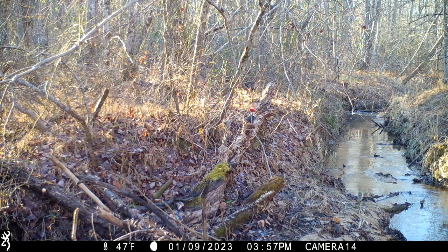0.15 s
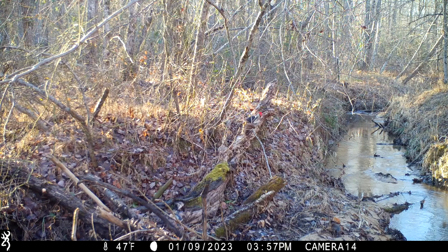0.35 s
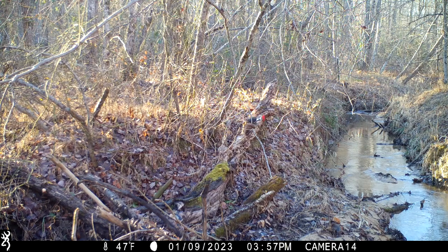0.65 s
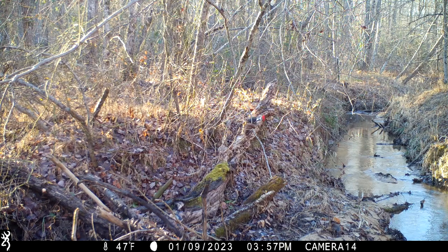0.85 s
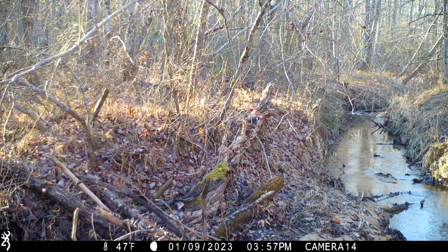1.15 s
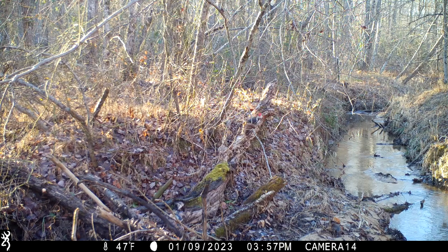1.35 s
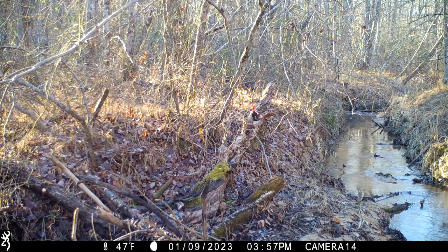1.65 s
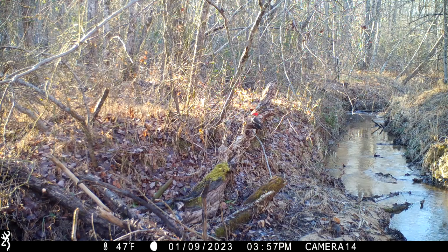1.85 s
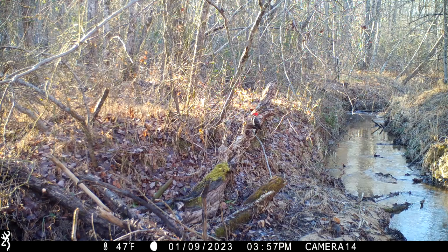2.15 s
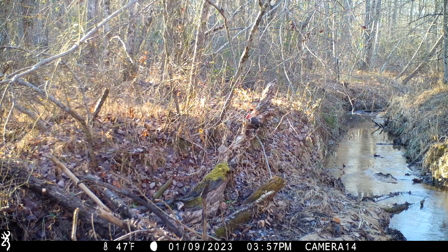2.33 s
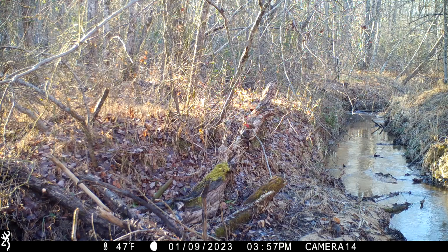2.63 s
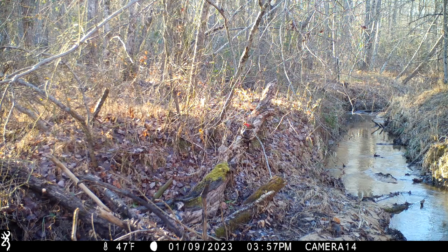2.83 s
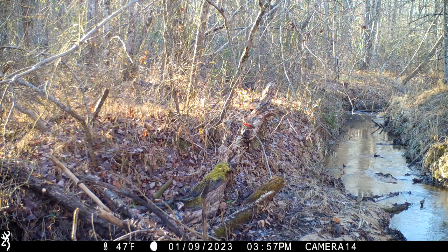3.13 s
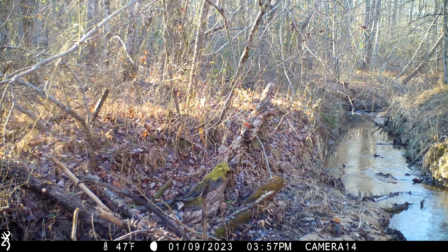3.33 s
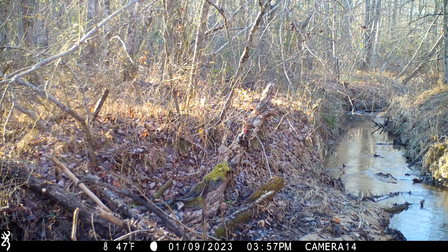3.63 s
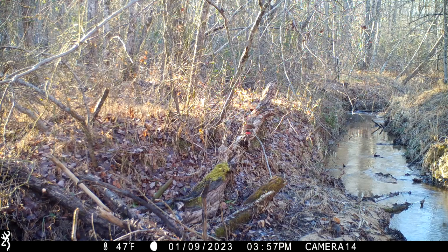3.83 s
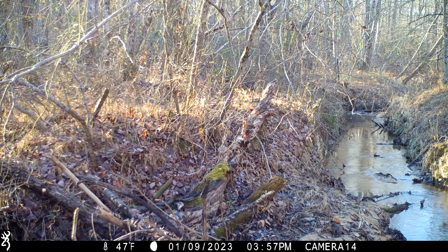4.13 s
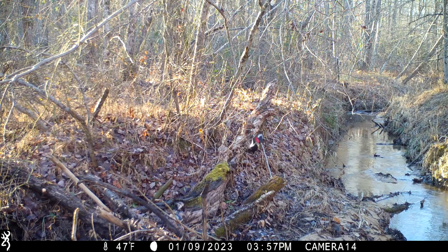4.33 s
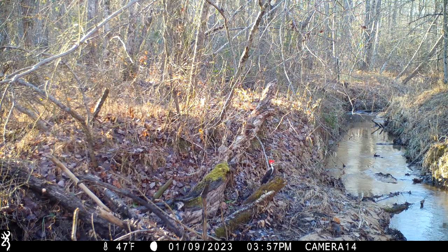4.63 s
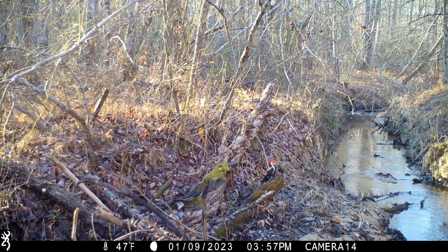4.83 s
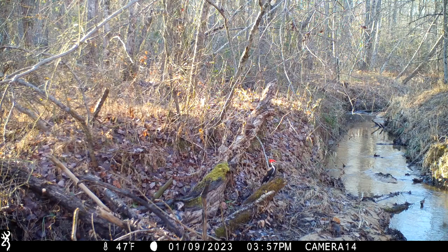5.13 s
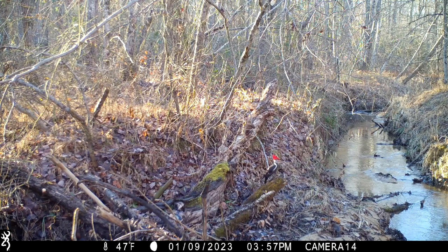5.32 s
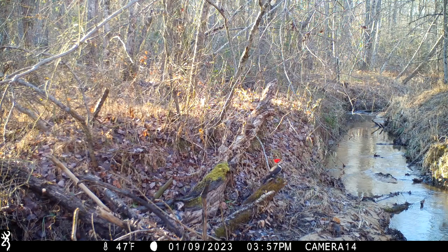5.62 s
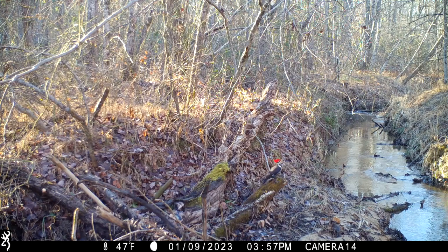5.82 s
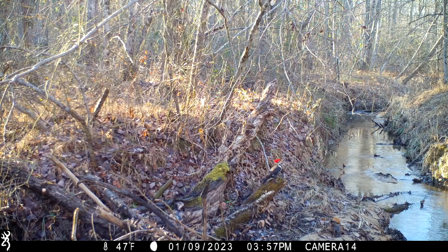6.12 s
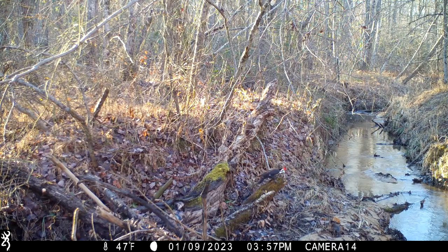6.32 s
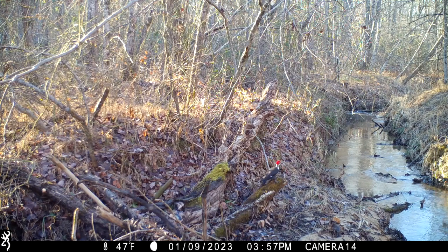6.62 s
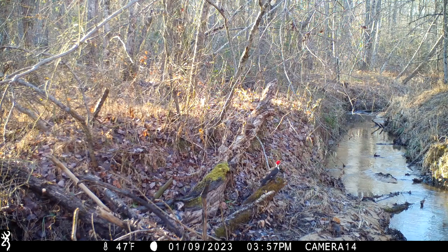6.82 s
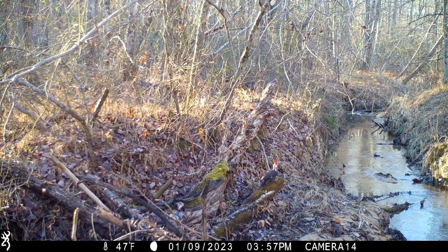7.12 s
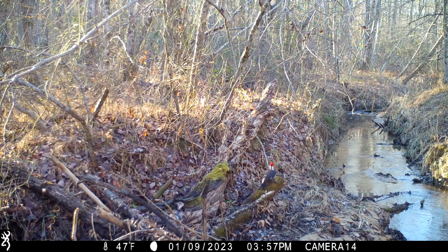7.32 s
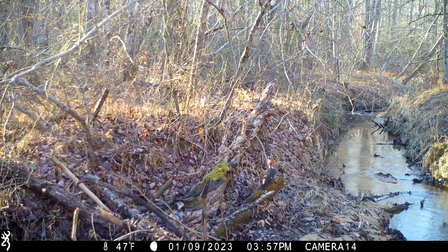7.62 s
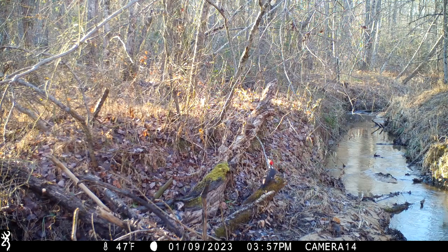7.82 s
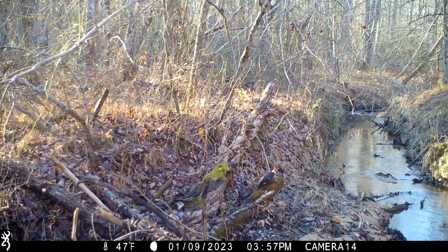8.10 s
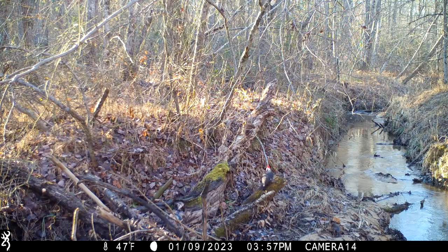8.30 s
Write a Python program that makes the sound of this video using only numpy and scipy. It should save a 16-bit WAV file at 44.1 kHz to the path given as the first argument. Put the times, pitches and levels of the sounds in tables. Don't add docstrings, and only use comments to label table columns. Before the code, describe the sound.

Brief, bright bird yelps repeat about four a second, thin out, and give way to sparse wood taps above a steady creek and faint engine hum.

```python
import sys
import numpy as np
from scipy import signal
from scipy.io import wavfile
from scipy.ndimage import uniform_filter1d

SR = 44100
rng = np.random.default_rng(int(sys.argv[2]) if len(sys.argv) > 2 else 0)


def persist_wave(psi):
    counts = np.round(np.clip(psi, -1, 1) * 32767).astype(np.int16)
    wavfile.write(sys.argv[1], SR, np.atleast_2d(counts).T)


def undo_db(level):
    steps = np.asarray(level, float) / 20
    return 10 ** steps


N = 373086


def evened(x):
    return x / np.sqrt(np.mean(x ** 2) + 1e-20)


def read(points, hz):
    f, value = np.transpose(points)
    return np.interp(np.log(hz + 1), np.log(f + 1), value)


def add(mix, start_s, sound):
    part = mix[round(start_s * SR):][:len(sound)]
    part += sound[:len(part)]


def slow(rate_hz, count):
    size = max(int(SR / rate_hz), 1)
    smooth = uniform_filter1d(rng.standard_normal(count), size)
    return evened(uniform_filter1d(smooth, size))


def camera_noise():
    # (frequency [Hz], level [dB])
    whine_lines = [(7639, -111), (7698, -107), (7757, -97), (7817, -99), (7876, -108), (7935, -113)]
    hiss_db = -85.5
    t = np.arange(N) / SR
    whine = 0
    for hz, db in whine_lines:
        whine = whine + undo_db(db) * np.sqrt(2) * np.sin(2 * np.pi * (hz * t + rng.random()))
    return whine + undo_db(hiss_db) * rng.standard_normal(N)


def wash():
    # (frequency [Hz], level [dB per Hz])
    wash_colour = [(20, -28.5), (60, -17), (120, -14), (270, -6), (500, -1.5), (1100, 0.5), (1800, -2.5),
                   (2640, -8), (3300, -13.5), (4040, -19.5), (5250, -29.5), (6500, -39.5), (8500, -61)]
    wash_db, patch_db = -52.5, 0.56
    frames, hz = N // 512 + 5, np.fft.rfftfreq(2048, 1 / SR)
    a, b, patches = rng.standard_normal((frames, 1025, 3)).T
    patches = uniform_filter1d(patches, 24, 0)
    patches = evened(uniform_filter1d(patches, 6, 1))
    spectra = (a + 1j * b) * undo_db(read(wash_colour, hz)[:, None] + patch_db * patches)
    noise = signal.istft(spectra, nperseg=2048, noverlap=1536)[1][:N]
    return undo_db(wash_db) * evened(noise)


def drones():
    drone_hz = [44, 73.8, 94]
    drone_db = [-85, -89.5, -85.5]
    # (drone number, loudest time [s], half length [s], level [dB])
    passes = [(1, 1.1, .1, -78), (1, 2.1, .3, -83), (1, 3.65, .65, -74.5), (1, 5.55, .45, -74),
              (1, 8.4, .3, -82), (2, 0., .1, -80), (2, 1.1, .3, -82), (2, 2.15, .35, -79),
              (2, 3.75, .6, -78.5), (2, 6.75, 1.6, -73), (0, 4.5, .15, -86)]
    t, out = np.arange(N) / SR, np.zeros(N)
    for k, (hz, db) in enumerate(zip(drone_hz, drone_db)):
        level = undo_db(db)
        for which, loudest_s, half_s, top_db in passes:
            if round(which) == k:
                level = level + undo_db(top_db) * np.exp(-((t - loudest_s) / half_s) ** 4)
        turns = np.cumsum(hz * (1 + 0.004 * slow(1.5, count=N))) / SR
        out += level * undo_db(1.6 * slow(5, count=N)) * np.sqrt(2) * np.sin(2 * np.pi * turns)
    return out


def trees(x):
    # (frequency [Hz], time to fall 60 dB [s])
    echo_decay = [(500, .3), (1000, .3), (2000, .33), (5000, .25)]
    # (frequency [Hz], level [dB])
    echo_colour = [(600, -9.5), (1000, -0.5), (1800, 2), (2600, 1), (5000, -8.5)]
    echo_db = -24
    taps = np.zeros(SR // 2)
    at = np.arange(300, len(taps) - 20, 20)
    taps[at + rng.integers(0, 20, len(at))] = rng.laplace(size=len(at))
    hz, t, z = signal.stft(taps, SR, nperseg=256)
    z *= undo_db(read(echo_colour, hz)[:, None] - 60 * t / read(echo_decay, hz)[:, None])
    tail = signal.istft(z, SR, nperseg=256)[1]
    tail *= undo_db(echo_db) / np.linalg.norm(tail)
    tail[0] = 1
    return signal.fftconvolve(x, tail)


def peck(start_s, db, ring_hz, contact_s, rebound_db, thump_db):
    t = np.arange(3000) / SR
    swell = (t / contact_s / 2 * np.exp(1 - t / contact_s / 2)) ** 2
    ring = -np.sin(2 * np.pi * ring_hz * t) * swell
    add(ring, 0.0016, undo_db(rebound_db) * ring)
    fall = undo_db(thump_db - 60 * t / 0.044)
    thump = fall * np.sin(2 * np.pi * 230 * t) * (1 - np.exp(-t / 0.0013))
    return start_s, undo_db(db) * (ring + thump)


def throat(hz):
    # (frequency [Hz], width [Hz], level [dB])
    resonances = [(977, 430, 9.5), (1822, 384, -1.5), (2290, 220, -10), (2543, 413, -10.5),
                  (3750, 1500, -29.5), (5060, 1600, -48.5), (5826, 430, -45.5)]
    total = 0
    for k, (f, width, db) in enumerate(resonances):
        total = total + (-1) ** k * undo_db(db) / (1 + 2j * (hz - f) / width) ** 2
    return abs(total)


def yelp(start_s, length_s, top_hz, effort_db, late, depth, throat_hz, *facing_db, shape=None):
    usual_arch = [(0, .706), (.1, .719), (.22, .819), (.35, 0.97), (.5, 1.), (.68, 0.97), (.85, .898),
                  (1, 0.785)]
    shape = usual_arch if shape is None else shape
    attack_s, release_s, edge_db, fade_s = 0.0056, 0.0094, -10, 0.002015
    t = np.arange(-fade_s, length_s + fade_s, 1 / SR)
    done = np.clip(t / length_s, 0, 1)
    along = done ** late
    sag = (1 - np.interp(along, *np.transpose(shape))) * np.where(along < 0.5, depth, 1)
    arch = uniform_filter1d(1 - sag, size=130, mode="nearest")
    pitch = top_hz * arch * (1 + 0.0055 * slow(500, count=len(t)))
    turns = np.cumsum(pitch) / SR + rng.random()
    octaves = np.log2(arch)

    stack = undo_db(23 * octaves) * np.cos(2 * np.pi * turns)
    high_db = 0.4 * facing_db[0] - 3.5 + 80 * octaves
    for k, db in enumerate((*facing_db, high_db, high_db - 4), 2):
        opening_db = -0.5 if k == 4 else 7.4
        flutter_db = 0.7 * (k - 1) ** 1.3
        db = db + opening_db * (done - 0.5) + flutter_db * slow(300, count=len(t))
        tuning = 1790 / throat_hz if k < 5 else 1
        wave = np.cos(2 * np.pi * k * turns + 0.45 * k * k)
        stack += undo_db(db) * throat(k * arch * top_hz * tuning) * wave

    edges = np.clip(1 - t / attack_s, 0, 2) + np.clip(1 - (length_s - t) / release_s, 0, 2)
    gate = np.clip(np.minimum(t - t[0], t[-1] - t) / fade_s, 0, 1)
    return start_s - fade_s, -np.sqrt(2) * undo_db(effort_db + edge_db * edges) * stack * gate ** 2


def hop():
    # (start [s], length [s], top pitch [Hz], effort [dB], crest lateness, 1 = middle)
    hop_call = (4.4625, .053, 1038, -37, 1.)
    # (depth of the rise, 1 = usual, throat [Hz], partials 2, 3, 4 towards the camera [dB] each)
    hop_posture = (1., 1830, 6, 3, -3)
    hop_arch = [(0, .76), (.1, .77), (.28, .81), (.38, .94), (.5, 1.), (.7, .87), (.85, .76), (1, .63)]
    bounce_s, bounce_share, landing_s, landing_db = 0.00048, 0.7, 0.043, -9
    start_s, sound = yelp(*hop_call, *hop_posture, shape=hop_arch)
    add(sound, bounce_s, -bounce_share * sound)
    jolt = np.clip((np.arange(len(sound)) / SR - landing_s) / 0.004, 0, 1)
    return start_s, sound * undo_db(landing_db * jolt)


def scene():
    # (start [s], length [s], top pitch [Hz], effort [dB], crest lateness, 1 = middle)
    yelps = [(0.1687, 0.049, 918, -41.5, 0.95), (0.4464, 0.045, 993, -36.4, 0.93),
             (0.974, 0.046, 971, -37, 0.9), (1.3099, 0.047, 949, -39.8, 0.99),
             (1.7639, 0.047, 1049, -35, 1.1), (2.027, 0.0403, 932.0, -38, 0.9068),
             (2.295, 0.046, 994, -35, 0.75), (2.5134, 0.04, 950, -39.5, 1.08),
             (2.7581, 0.042, 884, -41, 1.12), (3.0458, 0.047, 921, -38, 0.94),
             (3.2756, 0.0468, 928.0, -37.7, 1.14), (3.5088, 0.052, 972.0, -36.5, 1.02),
             (3.7786, 0.049, 951, -37.5, 0.96), (4.0914, 0.048, 948, -37.5, 0.84),
             (4.3019, 0.047, 972, -38, 1.06), (4.7279, 0.042, 977.0, -35.5, 0.93),
             (4.9477, 0.043, 994, -36, 0.89), (5.2209, 0.046, 978, -35.5, 0.92),
             (5.4501, 0.038, 956, -38.5, 0.9775), (5.7262, 0.043, 931, -41, 1.2),
             (5.9971, 0.043, 926, -41, 1.07), (6.7817, 0.044, 919, -41.3, 1.05)]
    # (depth of the rise, 1 = usual, throat [Hz],
    # partials 2, 3, 4 towards the camera [dB] each)
    postures = [(1.0, 1850, 1.5, -1.5, -1.0), (0.59, 2220, -4.5, -16.1, -12.5), (0.92, 1800, -3, -5.5, -7),
                (0.93, 1850, 4.0, 1.2, -3), (0.7, 1970, 2.4, -6, -1), (0.887, 1770, 3.9, 4.5, -2),
                (1.056, 1900, 2, -1.5, -8.4), (0.96, 1870, 3.5, 1.2, -2.8), (1.01, 1580, 2.5, 6, 0.3),
                (1.05, 1720, 0, -1.7, -7), (0.89, 1710, 0.6, -0.2, -5.1), (1.05, 1760, -2.5, -3, -1.5),
                (1.07, 1755, 1.9, 1, -2), (1.4, 1770, -3.5, 0.3, -2), (0.9, 1690, 5.5, -2, 3),
                (1.14, 1880, 2.6, -0.5, -3), (1.09, 1870, 5, 0.5, -5.5), (1.08, 1883.0, 3, -1.5, -4.2),
                (0.94, 1705, 8, 2.5, -1), (0.91, 1710, 11.5, 5, 2.5), (0.83, 1740, 11.1, 3, 2),
                (0.588, 1730, 7.3, 2.1, 3)]
    # (time [s], peak [dB], ring [Hz], contact [s], rebound [dB], thump against the ring [dB])
    pecks = [
        (6.3544, -30, 1300, .00028, -4, -14),
        (7.2043, -34.5, 1340, .0004, -14, -25),
        (8.1327, -38, 1000, .0004, -25, -25),
    ]
    mix = wash() + drones()
    sounds = [yelp(*call, *posture) for call, posture in zip(yelps, postures)]
    sounds += [hop()] + [peck(*row) for row in pecks]
    for start_s, sound in sounds:
        add(mix, start_s, trees(sound))
    return mix[None]


def roll_off(x):
    return signal.sosfilt(signal.butter(12, 14950, fs=SR, output="sos"), x)


def record(dry):
    fade_in = np.minimum(np.arange(N) / SR / 0.00095, 1)
    return roll_off((dry + camera_noise()) * fade_in)


dry = scene()
out = record(dry)
persist_wave(out)
```